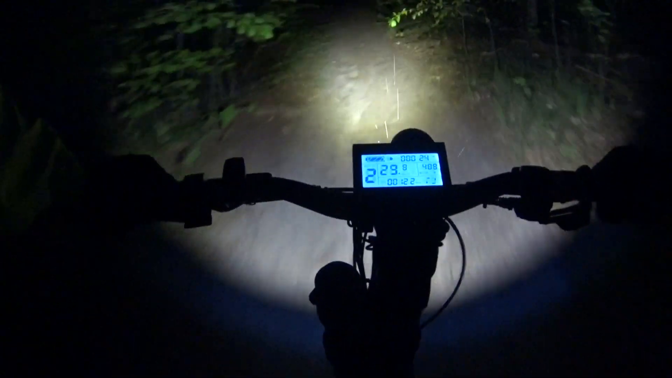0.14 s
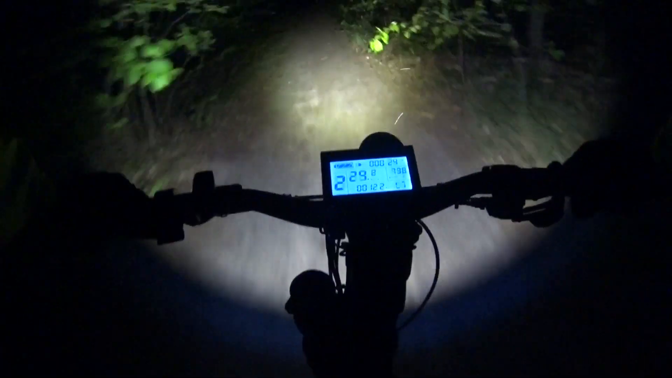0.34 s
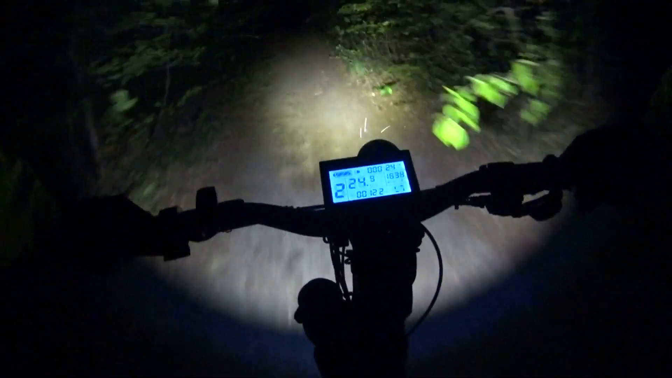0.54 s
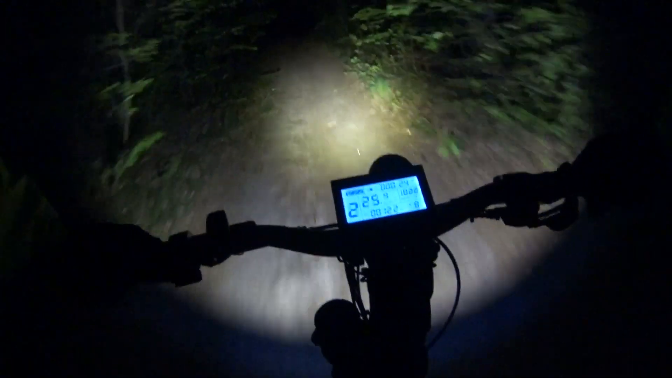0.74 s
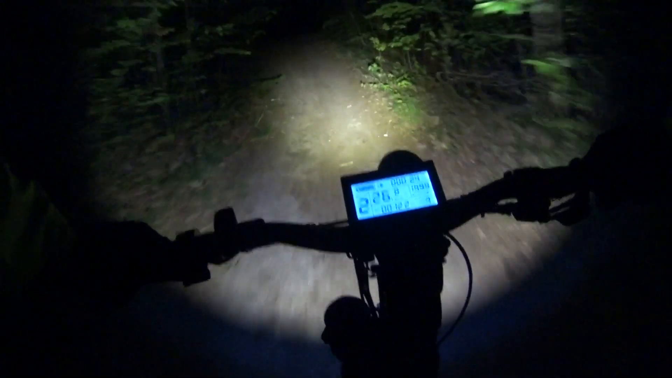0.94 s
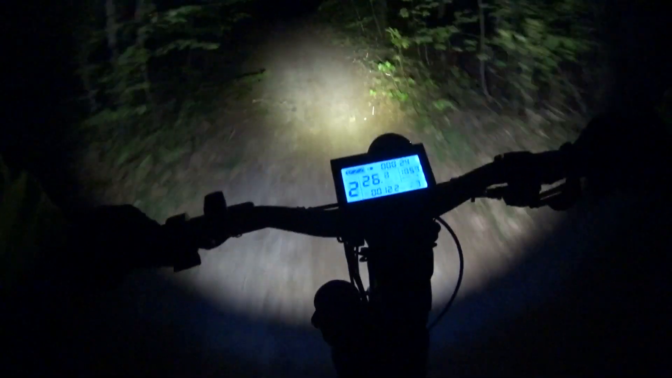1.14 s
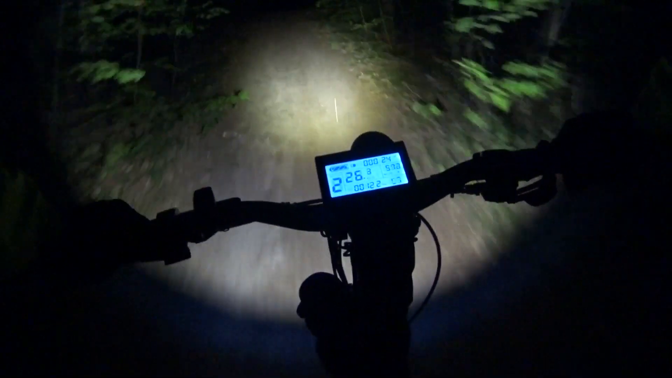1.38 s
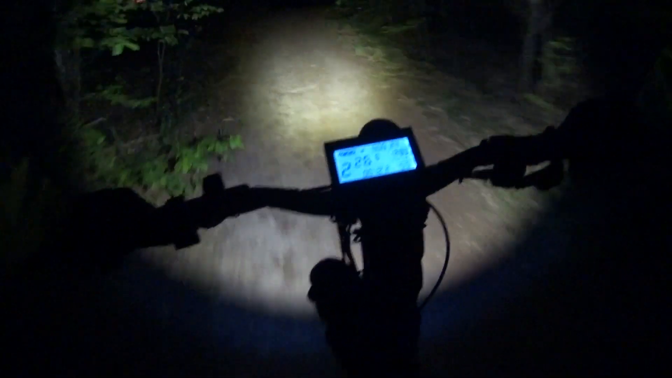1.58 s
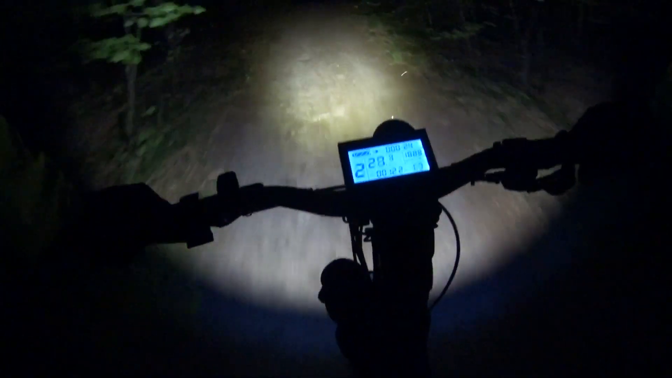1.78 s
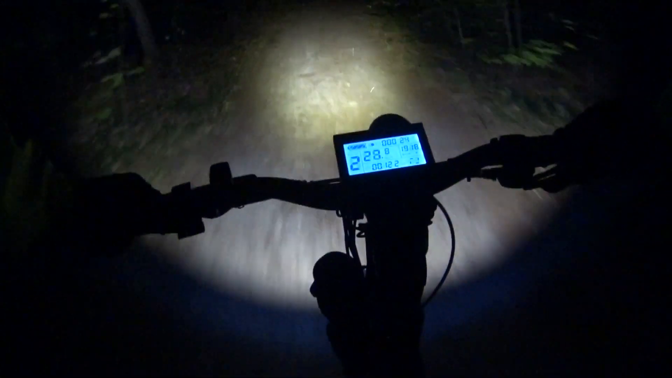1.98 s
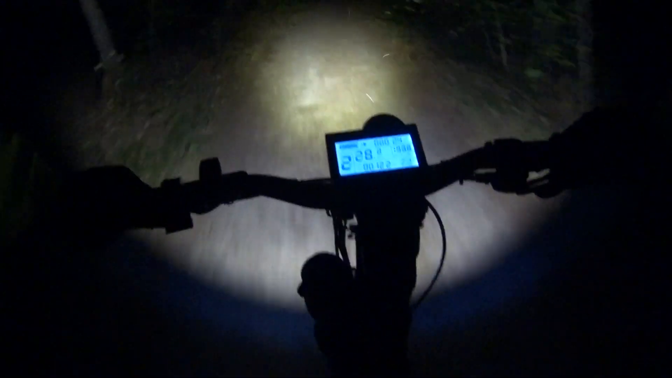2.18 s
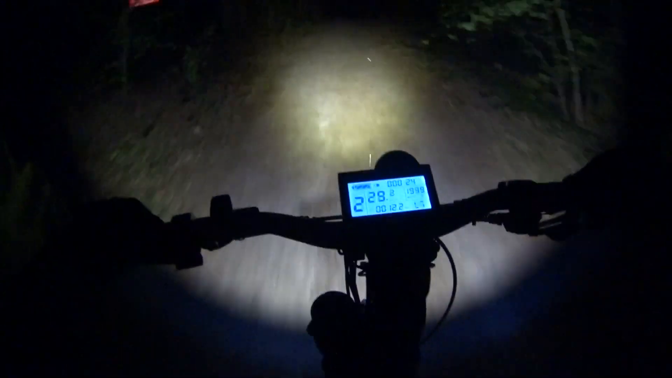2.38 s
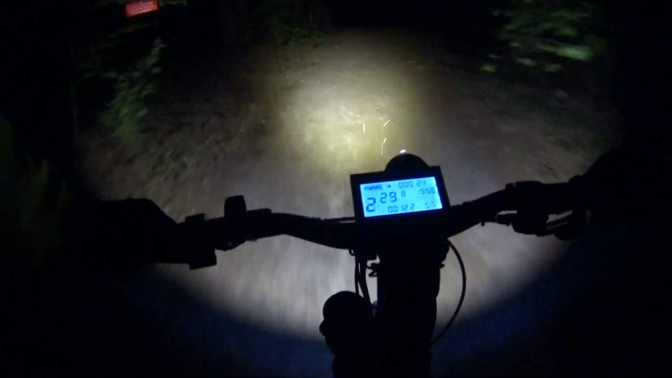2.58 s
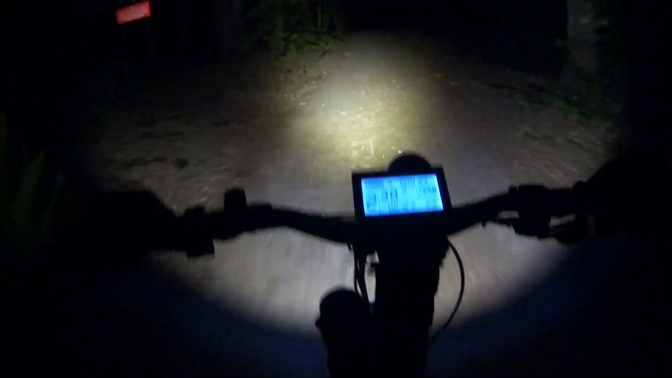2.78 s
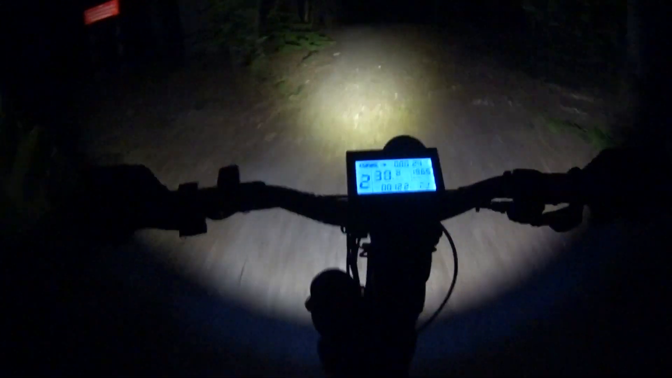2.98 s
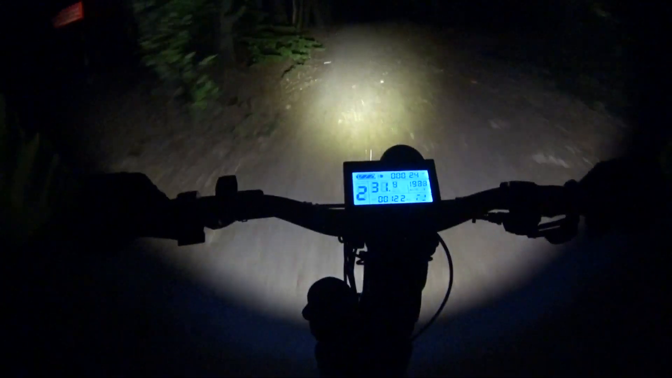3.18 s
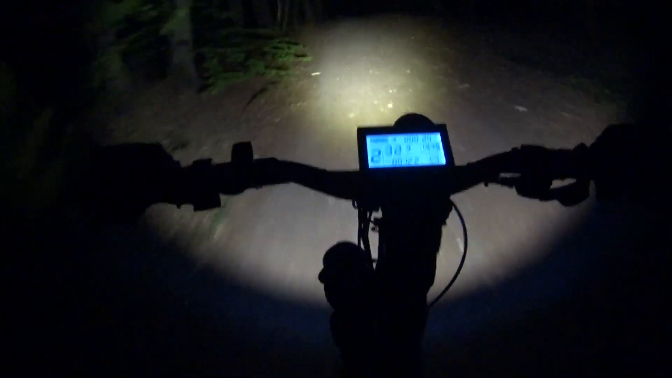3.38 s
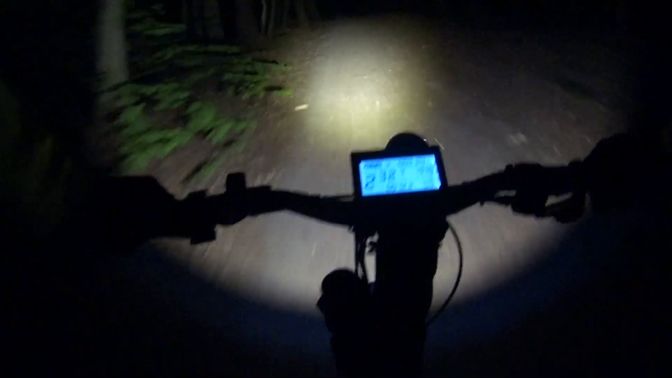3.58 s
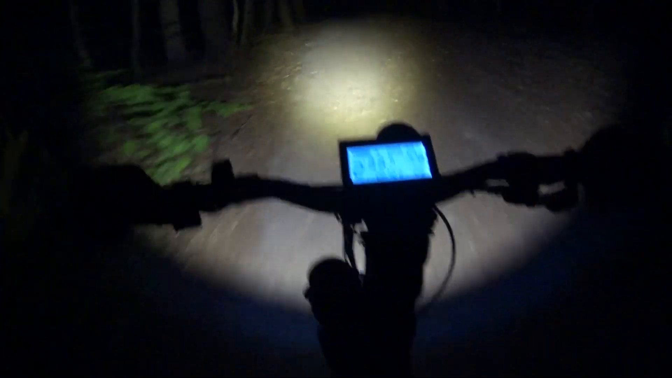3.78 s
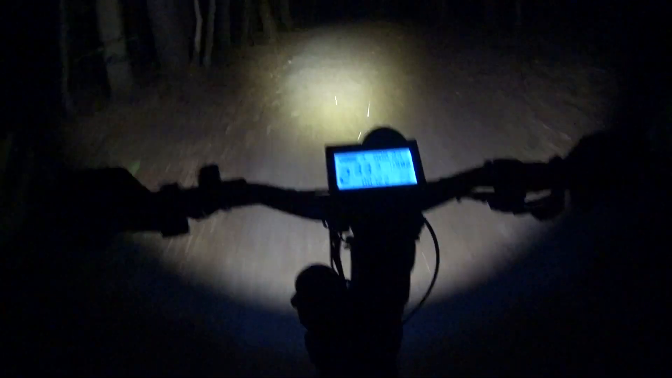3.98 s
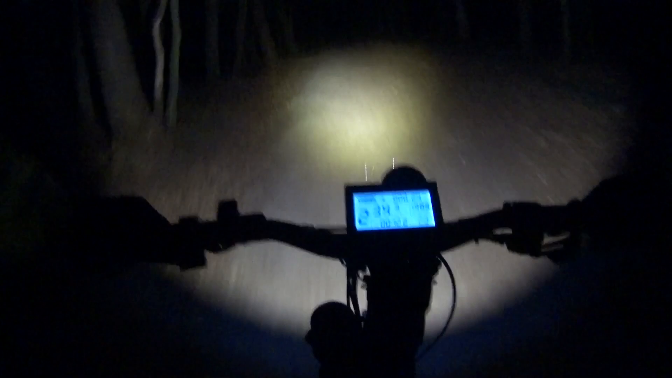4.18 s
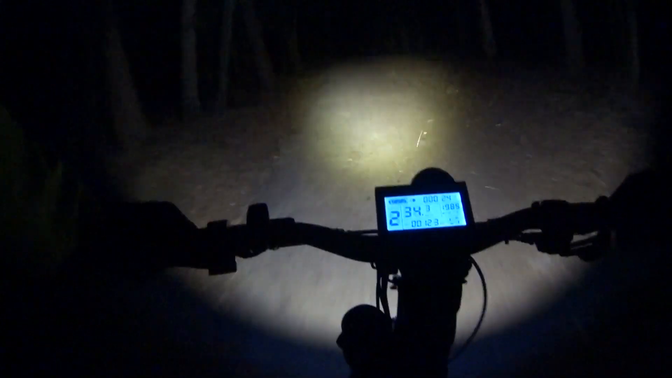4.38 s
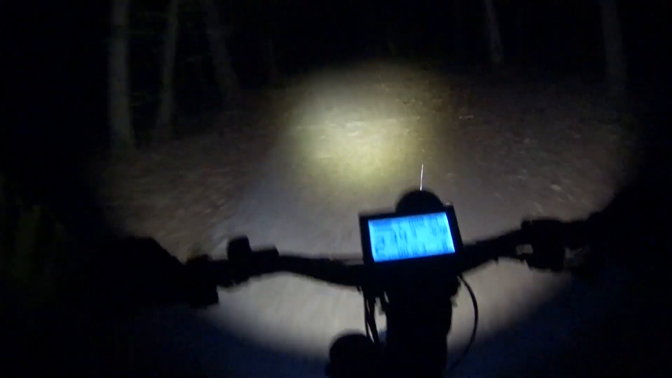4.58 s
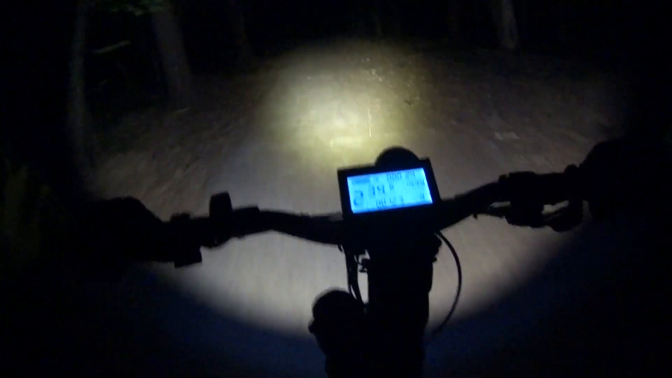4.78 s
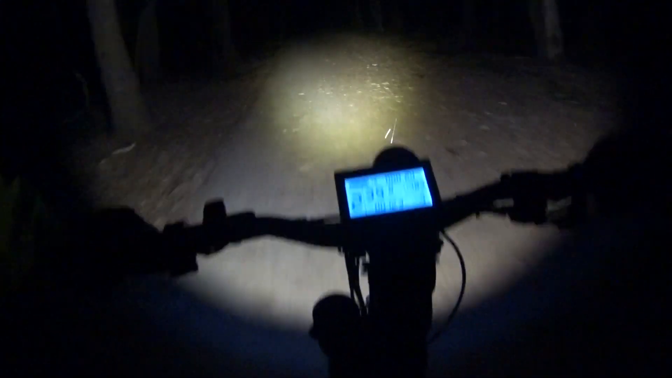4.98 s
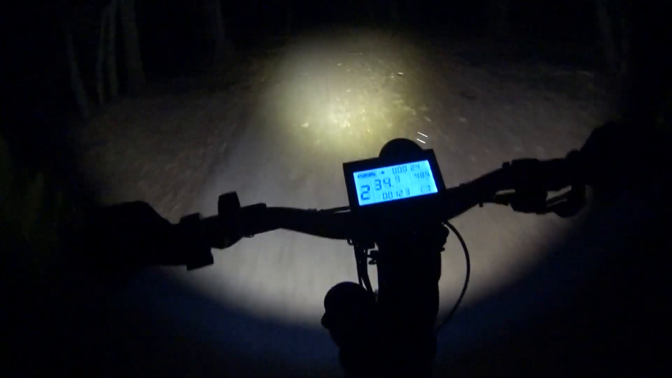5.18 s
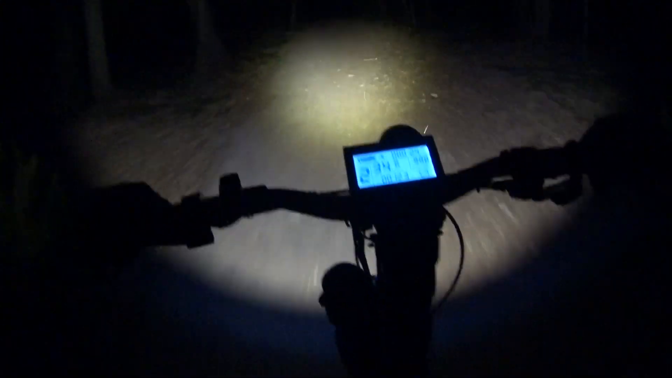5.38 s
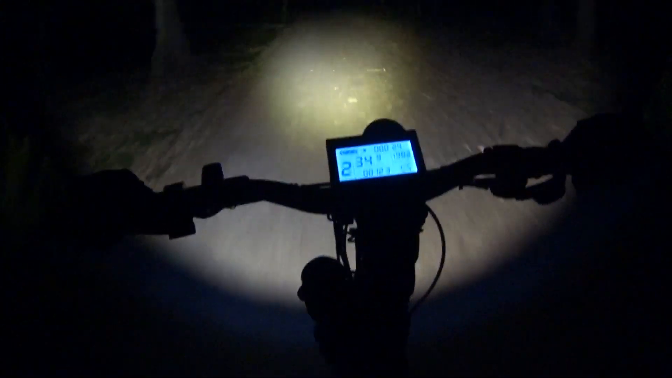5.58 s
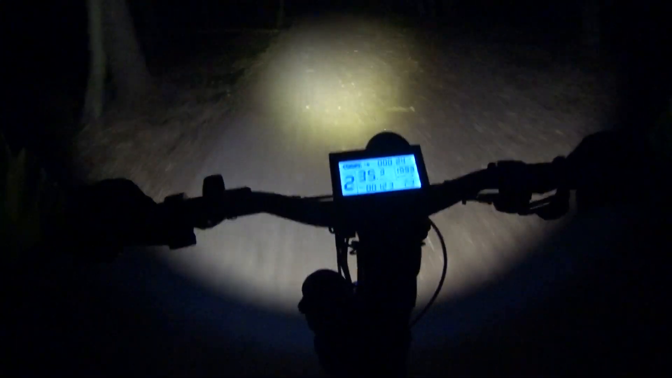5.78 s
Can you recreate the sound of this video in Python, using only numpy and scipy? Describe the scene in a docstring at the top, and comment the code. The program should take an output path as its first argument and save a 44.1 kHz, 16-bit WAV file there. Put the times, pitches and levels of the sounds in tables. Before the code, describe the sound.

Bicycle tyres rush and crackle over dry, gritty soil, growing louder as stones crack and bumps make the bike clack.

```python
"""An electric bike gathers speed on a dry forest track at night, heard from the rider's chest.
From the start grit pops under the tyres, flung sand ticks on the frame, rubber rushes over soil,
the casings drone and air brushes the microphone. Bigger stones crack from 0.1 s, bumps knock the
bike from 0.8 s, and from 1.4 s a brake disc zings against its pads; knocks and zings shake sand loose.
From 2 s the tyres bite harder and the grit grows denser and louder."""
import sys
import numpy as np
from scipy import signal
from scipy.fft import rfft, irfft
from scipy.io import wavfile
from scipy.ndimage import uniform_filter1d

SR = 44100
rng = np.random.default_rng(int(sys.argv[2]) if len(sys.argv) > 2 else 0)


def generate_wav(sig):
    """Save sig (samples, or channels by samples) to the path in sys.argv[1] as 16-bit PCM at SR."""
    pcm = np.round(np.clip(np.atleast_2d(sig).T, -1, 1) * 32767).astype(np.int16)
    wavfile.write(sys.argv[1], SR, pcm)


N = 257544
TAPS, CUTOFF_HZ = 2048, 11150
HZ = np.maximum(np.arange(TAPS // 2 + 1) * SR / TAPS, 1)
TIME_S = np.arange(N) / SR

# front wheel to the two microphone ports: freq_hz, right_lead_rad, left_over_right_db, coherence
MIC_PORTS = [(100, .25, -1.5, .92), (330, .5, -1.8, .94), (600, 1.7, -.8, .62), (1000, 1.5, -.6, .68),
             (1400, 1.2, -.2, .84), (1750, 1.2, 1.8, .75), (1950, 2.2, 3.5, .67), (2200, 2, 2.4, .78),
             (2500, 4.3, -.4, .4), (2850, 5.2, -1.4, .42), (3200, 6.3, -3.5, .4), (4300, 6.55, -2.6, .85),
             (5300, 6.7, -1.5, .42), (7700, 6.3, -.5, .68), (11000, 6.3, -.4, .75)]
# bike speed: time_s, speed_kmh
BIKE_SPEED = [(0, 23.5), (1, 26), (2, 28), (3, 30.5), (4, 34), (5.84, 35)]
# crunch as the tyres bite into more or less loose grit: time_s, level_db
CRUNCH_LEVEL = [(0.0, -36.5), (0.57, -37.5), (0.74, -33), (0.92, -34.5), (1.5, -34.0), (2.0, -30),
                (2.08, -25), (2.26, -23), (2.36, -26), (2.76, -26.5), (2.99, -22), (3.46, -25.5),
                (3.87, -22.5), (3.99, -19.5), (4.12, -22.5), (4.86, -20.5), (4.98, -22), (5.18, -22),
                (5.36, -23.5), (5.69, -19.5), (5.84, -21)]
# coarse grit spectrum: freq_hz, density_db
GRIT_COLOUR = [(150, -57), (450, -22.5), (700, -16), (1000, -9), (1200, -6), (1400, -1), (1700, 1),
               (1900, -4), (2200, 3.5), (2600, -1.5), (3050, -12.5), (3700, -20.5), (5500, -31),
               (11000, -79.5)]
# fine grit spectrum: freq_hz, density_db
FINE_COLOUR = [(900, -41), (2000, -9), (3000, 10.5), (3600, 2.5), (4350, 9), (5100, -7.5), (6000, -3.5),
               (7100, -14.5), (8100, -18), (9000, -24.5), (11000, -38.5)]
# sand tick spectrum: freq_hz, density_db
SAND_COLOUR = [(2500, -1), (4500, 10.5), (8500, 1.5), (11000, -14.5)]
# rolling rush spectrum: freq_hz, density_db
RUSH_COLOUR = [(200, -25), (450, -21.5), (700, -7.5), (1150, -5.5), (1380, 3.5), (1520, -4), (1680, 2.5),
               (1900, -9.5), (2170, -16), (2550, -4.5), (3400, -20), (4400, -23.5), (5300, -30.5),
               (11000, -68.5)]
# tyre casing spectrum: freq_hz, density_db
CASING_COLOUR = [(40, -9), (75, -12.5), (130, -7), (230, -5.5), (280, 0), (305, -4.5), (328, -1), (365, -1),
                 (440, -5.5), (520, -5.5), (580, -8), (1200, -36.5)]
# air resonances in the tyres: pitch_hz, width_hz, over_casing_db
CAVITY_MODES = [(313.4, 9.9, -7), (514, 9.1, -12)]
# air buffeting the microphone: time_s, level_db
AIR_LEVEL = [(0.0, -70), (1.4, -64), (2.05, -60), (2.75, -56), (3.1, -64), (4.3, -60.5), (5.3, -65),
             (5.84, -65.2)]
# bigger stones cracking under the tread: start_s, level_db
STONE_CRACKS = [(0.131, -18), (0.2373, -17), (0.5016, -19), (0.7274, -17), (0.7522, -13), (0.8985, -16),
                (1.1173, -17), (1.4405, -16), (1.630, -17), (1.6831, -13), (1.9486, -10), (2.0031, -11),
                (2.5513, -8), (2.9979, -5), (3.2473, -6), (4.3387, -3), (5.1265, -4), (5.2494, -3)]
# knocks from bumps: start_s, level_db, t60_s, body_over_clack_db, ring_hz
BUMP_KNOCKS = [(.7555, -37, .05, 0, 3400), (.766, -35, .05, 0, 4400), (.9765, -33, .02, -14, 4950),
               (1.1155, -36, .04, 5, 3300), (1.439, -37, .04, 5, 6450), (1.630, -38, .04, 8, 3300),
               (2.181, -34, .018, -8, 5000), (2.221, -33, .022, -8, 5900), (2.378, -26, .012, -12, 4200),
               (2.389, -35, .05, -8, 4700), (2.663, -33, .06, 12, 4600), (3.008, -32, .03, 4, 4400),
               (4.188, -42, .04, -6, 8500), (4.2365, -28, .02, -6, 4400), (4.459, -41, .04, -6, 8700),
               (4.654, -24, .025, -5, 4150), (4.832, -35, .09, 0, 4400), (5.108, -39, .03, -6, 8600),
               (5.4655, -34, .03, 3, 4300)]
# bright clack of a knock: freq_hz, density_db
CLACK_COLOUR = [(800, -39), (2500, -9), (3500, 16.5), (4400, 11), (5300, 5), (6100, -3), (7200, -11),
                (11000, -33)]
# dull body of a knock: freq_hz, density_db
BODY_COLOUR = [(150, -38), (700, -16), (1350, 1), (1900, -4), (2600, -2), (4000, -14), (9000, -45)]
# disc grazing its pads as the fork flexes: start_s, level_db, length_s
DISC_GRAZES = [(1.445, -55, 0.035), (1.605, -54, 0.022), (1.666, -48.5, .035), (2.324, -43.5, 0.047),
               (2.392, -43.5, 0.037), (2.476, -38.5, .006), (2.614, -48, 0.046), (3.693, -44, .008),
               (4.27, -42, .01), (4.37, -45.5, .055), (4.483, -42, .008), (4.734, -60, 0.032),
               (5.228, -47, .015), (5.46, -45.5, 0.035)]
# brake disc modes: pitch_hz, level_db
DISC_MODES = [(7720, 3), (7850, -11), (6500, -5)]
# pad scrape spectrum: freq_hz, density_db
SCRAPE_COLOUR = [(2500, -16), (6000, 7), (8500, -6), (11000, -18)]


def from_db(db):
    """Decibels to gain."""
    return 10 ** (np.asarray(db) / 20)


def rms_one(x):
    """Scale the stereo centre to rms 1."""
    return x / np.sqrt(np.mean(np.atleast_2d(x).mean(axis=0) ** 2) + 1e-20)


def in_time(rows):
    """One time curve per value column."""
    time_s, *columns = np.transpose(rows)
    return [np.interp(TIME_S, time_s, c) for c in columns]


def in_pitch(rows):
    """One frequency curve per value column."""
    freq_hz, *columns = np.transpose(rows)
    return [np.interp(np.log(HZ), np.log(freq_hz), c) for c in columns]


def with_speed(cruise_db, power, cruise_kmh=30):
    """Level in dB for an amplitude that grows as a power of speed."""
    speed_kmh, = in_time(BIKE_SPEED)
    return cruise_db + power * 20 * np.log10(speed_kmh / cruise_kmh)


def drift(rate_hz):
    """Slow random curve, spread 1."""
    hop, settle = 40, 2000
    pole = np.exp(-2 * np.pi * rate_hz * hop / SR)
    noise = rng.standard_normal(N // hop + settle + 2)
    slow = signal.lfilter([1], [1, -2 * pole, pole * pole], noise)[settle:]
    return np.interp(np.arange(N) / hop, np.arange(len(slow)), rms_one(slow))


def minimum_phase(colour_db):
    """Spectrum with a sharp attack, then ringing."""
    cepstrum = irfft(colour_db * np.log(10) / 20)
    one_sample_delay = np.exp(-2j * np.pi * np.arange(len(HZ)) / TAPS)
    return np.exp(rfft(2 * cepstrum[1:TAPS // 2], TAPS) * one_sample_delay + cepstrum[0])


def path(colour_db, scatter_s, diffuse=1):
    """Stereo click response: direct sound plus scatter off bike and rider, different at each port."""
    lead_rad, balance_db, coherence = in_pitch(MIC_PORTS)
    coherence = np.clip(1 - diffuse * (1 - coherence), 0, 1)
    scatter = rng.standard_normal((2, TAPS)) * np.exp(-np.arange(TAPS) / SR / scatter_s)
    scatter = rfft(scatter / np.linalg.norm(scatter, axis=1, keepdims=True))
    direct = np.exp(-1j * lead_rad * np.array([[1], [0]]))
    ports = np.sqrt(coherence) * direct + np.sqrt(1 - coherence) * scatter
    ports *= from_db([balance_db / 2, -balance_db / 2])
    fade = np.minimum(np.linspace(4, 0, TAPS), 1) ** 2
    return np.roll(irfft(ports * minimum_phase(colour_db)), 24, axis=1) * fade


def through(x, response):
    """Mono signal through a stereo response."""
    return signal.oaconvolve(x[None], response, axes=1)[:, :len(x)]


def add(out, start_s, sound):
    """Mix in a short sound."""
    at = max(round(start_s * SR), 0)
    out[:, at:at + sound.shape[1]] += sound[:, :max(N - at, 0)]


def rolling_noise(colour, scatter_s, paths, diffuse=1):
    """Coloured noise over several independent paths, rms 1."""
    colour_db, = in_pitch(colour)
    parts = (through(rng.standard_normal(N), path(colour_db, scatter_s, diffuse)) for _ in range(paths))
    return rms_one(sum(parts))


def grain_colour(colour, vary_db):
    """Each grain's size puts its own bumps on the common spectrum."""
    knots_hz = np.geomspace(500, 11000, num=12)
    bumps = np.interp(np.log(HZ), np.log(knots_hz), rng.standard_normal(len(knots_hz)))
    return in_pitch(colour)[0] + vary_db * bumps


def crackle(per_s, colour, size_db, size_cap, bed, vary_db, scatter_s, kinds):
    """Random pops, many small and few large, over a bed of tiny ones; steady rms 1."""
    born = rng.random(N) < per_s / SR
    sizes = from_db(size_db * np.minimum(rng.exponential(1, N), size_cap)) * rng.choice([-1, 1], N)
    clicks = rms_one(born * sizes / np.sqrt(per_s)) + bed * rng.standard_normal(N)
    clicks /= np.sqrt(uniform_filter1d(clicks ** 2, size=3000) + 1e-9)
    kind = rng.integers(0, kinds, N)
    responses = (path(grain_colour(colour, vary_db), scatter_s) for _ in range(kinds))
    return rms_one(sum(through(clicks * (kind == k), response) for k, response in enumerate(responses)))


def grit(firm_ground_db=-25.5, firm_pops_per_s=1700):
    """A harder bite crushes more grit, with a brighter edge; uneven ground makes it clump."""
    crunch_db, = in_time(CRUNCH_LEVEL)
    bite_db = crunch_db - firm_ground_db  # negative on soft soil
    per_s = firm_pops_per_s * from_db(.66 * bite_db)
    uneven_db = .6 * drift(rate_hz=24) + .5 * drift(rate_hz=7.4)
    coarse = crackle(per_s, GRIT_COLOUR, size_db=4.5, size_cap=2.78, bed=.28,
                     vary_db=1.5, scatter_s=.00047, kinds=20)
    edge = signal.sosfilt(signal.butter(1, [2500, 3900], "band", fs=SR, output="sos"), coarse)
    edge_db = .77 * np.maximum(bite_db, -5.5)
    coarse += edge * (from_db(edge_db) - 1)
    coarse_db = crunch_db - 1.98 + .069 * np.minimum(bite_db, 0)
    fine = crackle(1.5 * per_s, FINE_COLOUR, size_db=2.5, size_cap=6.6, bed=.8,
                   vary_db=2.5, scatter_s=.0011, kinds=10)
    patches_db = 1.46 * drift(rate_hz=24)
    fine_db = with_speed(cruise_db=-45, power=1.3) + .83 * np.maximum(bite_db, 0) + patches_db
    return coarse * from_db(coarse_db + uneven_db) + fine * from_db(fine_db + uneven_db)


def sand(ticks_per_s=140, shake_db=5, shake_fade_s=.024):
    """Sand off the tread ticks on the frame, louder with speed and just after each bump."""
    shake = np.zeros(N)
    for start_s, *_ in BUMP_KNOCKS + DISC_GRAZES:
        age_s = TIME_S - start_s
        shake = np.maximum(shake, (age_s >= 0) * np.exp(-np.abs(age_s) / shake_fade_s))
    ticks = crackle(ticks_per_s, SAND_COLOUR, size_db=4, size_cap=2.8, bed=.8,
                    vary_db=2.5, scatter_s=.002, kinds=4)
    level_db = with_speed(cruise_db=-57, power=1.1) + shake_db * shake + 1.3 * drift(rate_hz=2.5)
    return ticks * from_db(level_db)


def rush():
    """Rubber on packed soil: a smooth rush that grows with speed."""
    rubbing = rolling_noise(RUSH_COLOUR, scatter_s=.0019, paths=6, diffuse=.37)
    return rubbing * from_db(with_speed(cruise_db=-36, power=2.2))


def tyre_drone():
    """The ground shakes the tyre casings and the air in them."""
    casing = rolling_noise(CASING_COLOUR, scatter_s=.0044, paths=4)
    cavity = np.zeros(N)
    for pitch_hz, width_hz, over_casing_db in CAVITY_MODES:
        resonator = signal.iirpeak(pitch_hz, pitch_hz / width_hz, fs=SR)
        cavity += from_db(over_casing_db) * rms_one(signal.lfilter(*resonator, rng.standard_normal(N)))
    return (casing + cavity) * from_db(with_speed(cruise_db=-48.5, power=2.52))


def air(band_hz=(14, 42), gust_db=3):
    """Soft, gusty pressure swings on the microphone ports."""
    level_db, = in_time(AIR_LEVEL)
    band = signal.butter(2, band_hz, "band", fs=SR, output="sos")
    common, left, right = signal.sosfilt(band, rng.standard_normal((3, N)))
    pressure = rms_one(common + .18 * np.array([left, right]))
    return pressure * from_db(level_db + gust_db * drift(rate_hz=7.2))


def stones():
    """A bigger stone pops sharply, then more weakly as it splits."""
    out = np.zeros((2, N))
    for start_s, level_db in STONE_CRACKS:
        split_s = rng.uniform(.0005, .0014)
        for delay_s, part_db in ((0, -1), (split_s, -4)):
            pop = path(grain_colour(GRIT_COLOUR, vary_db=1.8), scatter_s=.0004, diffuse=.6)
            add(out, start_s + delay_s, pop / np.abs(pop).max() * from_db(level_db + part_db))
    return out


def knocks(touches_per_s=3000, usual_t60_s=.057, ring_peak_db=11, ring_half_width_hz=240):
    """Bumps make parts chatter: a ringing clack over a dull body. Short, hard knocks are brighter."""
    out, age_s = np.zeros((2, N)), TIME_S[:SR // 8]
    for start_s, level_db, t60_s, body_over_clack_db, ring_hz in BUMP_KNOCKS:
        touches = rng.choice([-1, 1], len(age_s)) * (rng.random(len(age_s)) < touches_per_s / SR)
        touches[0] = 1
        chatter = touches * from_db(-60 * age_s / t60_s)
        ring_db = ring_peak_db / (1 + ((HZ - ring_hz) / ring_half_width_hz) ** 2)
        tilt_db_per_octave = 7.5 * np.log2(usual_t60_s / t60_s)
        octaves = np.log2(np.clip(HZ, 800, CUTOFF_HZ) / ring_hz)
        clack_db = in_pitch(CLACK_COLOUR)[0] + ring_db + tilt_db_per_octave * octaves
        for colour_db, part_db in ((clack_db, 0), (in_pitch(BODY_COLOUR)[0], body_over_clack_db)):
            part = through(chatter, path(colour_db, scatter_s=.00056, diffuse=.59))
            early_rms = np.sqrt(np.mean(part[:, :round(t60_s * SR / 5)] ** 2))
            add(out, start_s, part / early_rms * from_db(level_db + part_db))
    return out


def disc_zings(sing_db=-7, scrape_db=-3):
    """Each graze scrapes the brake disc and sets it singing roughly; the pads then damp it fast."""
    envelope = np.zeros(N)
    for start_s, level_db, length_s in DISC_GRAZES:
        corners_s = [0, .004, length_s, length_s + .005, length_s + .03]
        envelope += from_db(level_db) * np.interp(TIME_S - start_s, corners_s, [0, 1, .7, .25, 0])
    sing = np.zeros(N)
    for pitch_hz, level_db in DISC_MODES:
        rough_gain = from_db(level_db + 3.5 * drift(rate_hz=150))
        sing += rough_gain * np.sin(2 * np.pi * pitch_hz * TIME_S + drift(rate_hz=60))
    scrape = crackle(900, SCRAPE_COLOUR, size_db=4.5, size_cap=3, bed=.3,
                     vary_db=2.5, scatter_s=.0009, kinds=4)
    return envelope * (sing * from_db(sing_db) + scrape * from_db(scrape_db))


def scene():
    """All sources ride along with the microphone, in open air."""
    return grit() + sand() + rush() + stones() + knocks() + disc_zings() + tyre_drone() + air()


def record(dry):
    """Soft clip, then steep low-pass."""
    rounded = 1.255 * np.tanh(dry / 1.334)
    return signal.sosfilt(signal.ellip(10, .3, 70, CUTOFF_HZ, fs=SR, output="sos"), rounded)


dry = scene()
out = record(dry)
generate_wav(out)
```